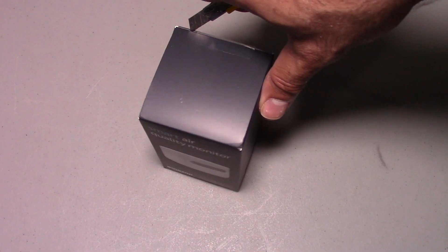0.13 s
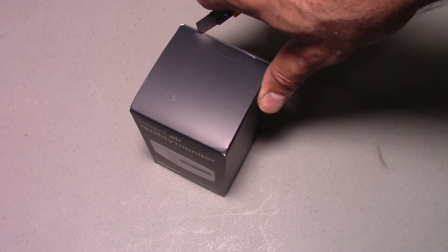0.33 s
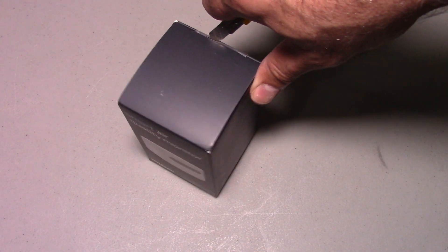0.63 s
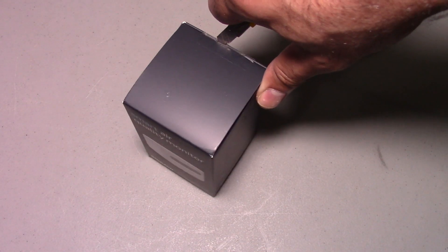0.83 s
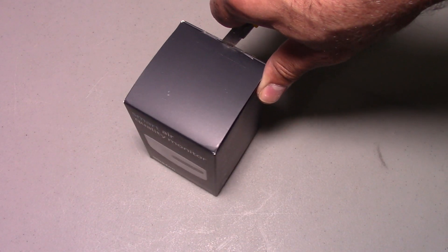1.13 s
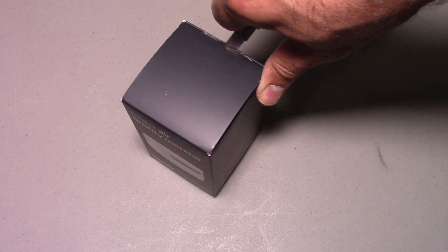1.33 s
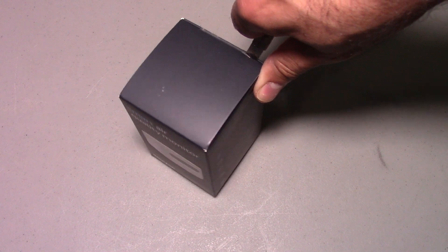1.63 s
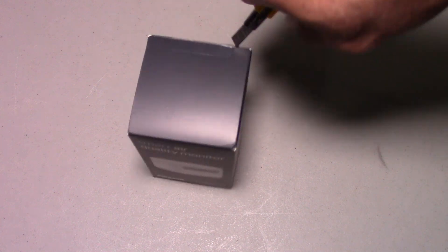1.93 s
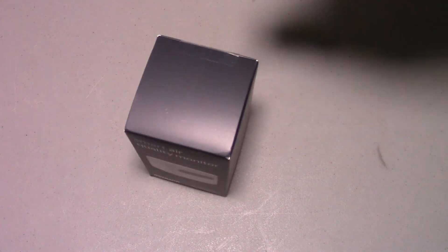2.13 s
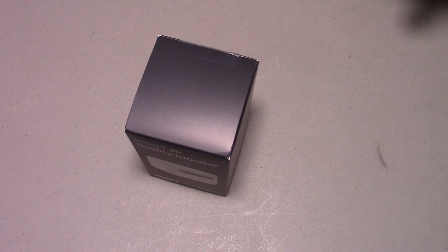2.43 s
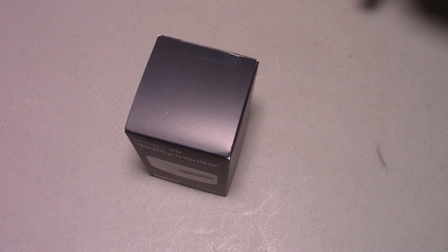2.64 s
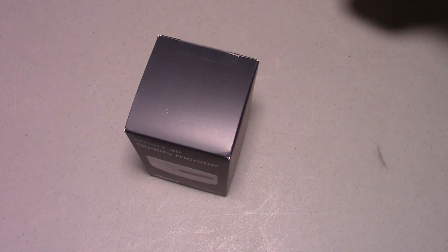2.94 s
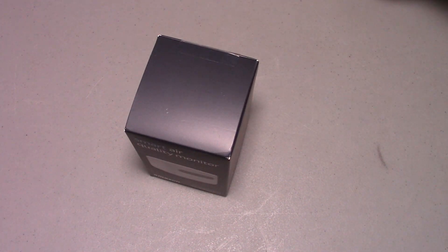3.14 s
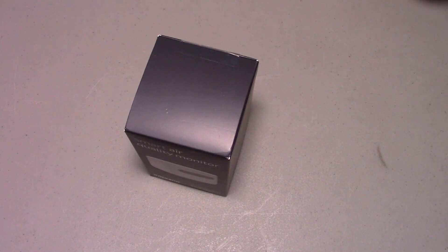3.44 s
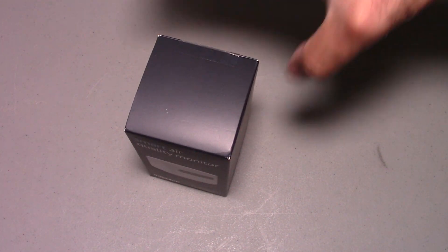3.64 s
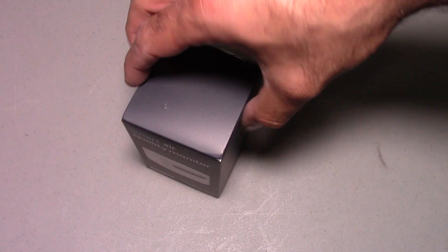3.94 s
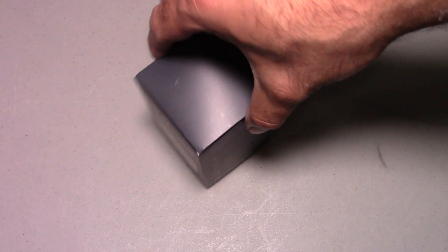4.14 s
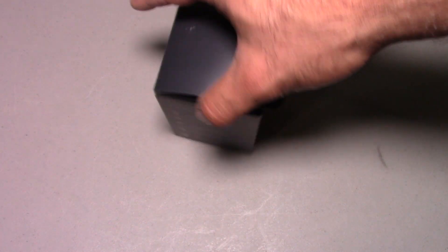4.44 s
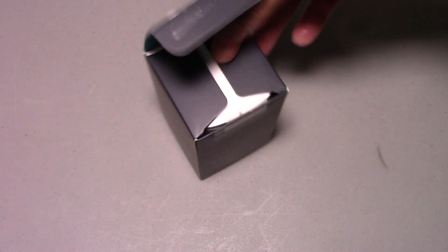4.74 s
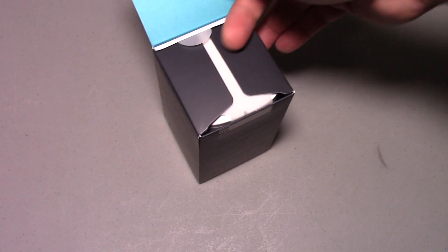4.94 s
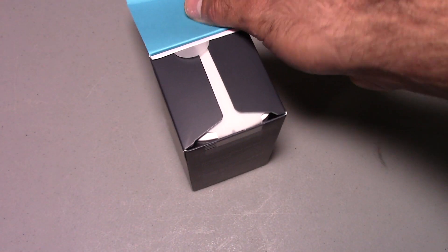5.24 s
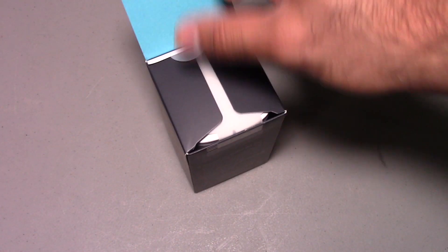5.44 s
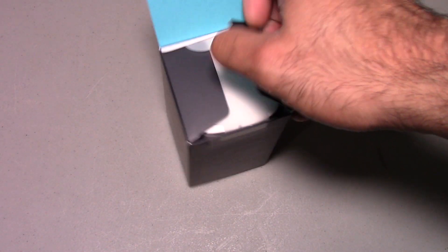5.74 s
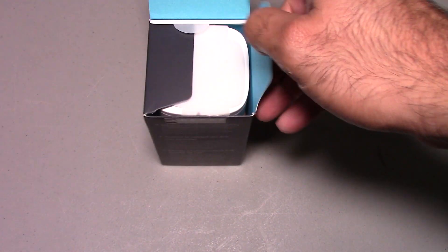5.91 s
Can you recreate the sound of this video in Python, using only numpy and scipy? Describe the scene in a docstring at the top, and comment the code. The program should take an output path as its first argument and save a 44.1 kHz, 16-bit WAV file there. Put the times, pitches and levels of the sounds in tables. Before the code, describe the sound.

A blade crackles through a cardboard seal, ratchets back into its handle and clatters onto a desk, then box flaps pop open with rubs and squeaks.

```python
"""First a seal crackles: a snap-off knife slits a small cardboard box on a desk in a bare, live room.
The blade ratchets back into its handle, soft scuffs follow, and the knife drops on the desk;
then the lid is pulled free and the flaps fold open, with taps, rubs and thin squeaks.
Card and blows are bursts of noisy slips through resonances; blade and desk are decaying sines.
One microphone stands on the desk, amid a low room rumble and an even hiss."""
import sys
import numpy as np
from scipy import signal
from scipy.fft import rfft, irfft
from scipy.io import wavfile
from scipy.ndimage import uniform_filter1d

SR = 44100
rng = np.random.default_rng(int(sys.argv[2]) if len(sys.argv) > 2 else 0)


def wrap_up_sound(samples):
    """Save the sound to the file named by the first command line argument, as 16-bit audio."""
    columns = np.atleast_2d(samples).T
    # keep every value between -1 and 1, then stretch to whole-number steps
    tamed = np.clip(columns, -1, 1)
    steps = np.round(tamed * 32767).astype(np.int16)
    wavfile.write(sys.argv[1], SR, steps)


N = 267731
TIME = np.arange(N) / SR
SHORT = TIME[:SR // 2]  # half a second, enough for any single event
TOP_HZ = 16200  # upper limit of the microphone signal


def undb(db):
    """Decibels to gain."""
    return 10 ** (np.asarray(db) / 20)


def unit(x):
    """Scale to an energy of one."""
    return x / np.sqrt(np.sum(x ** 2))


def steady(x):
    """Scale to an rms of one."""
    return x / np.std(x)


def add(track, s, x):
    """Mix x into the track at time s."""
    i = max(int(s * SR), 0)
    track[i:i + len(x)] += x[:N - i]


def delayed(x, s):
    """The same sound s seconds later."""
    return np.pad(x, (max(int(s * SR), 0), 0))[:len(x)]


def gate(age, length, attack_s, release_s):
    """Attack, hold and release within the given length."""
    attack = np.clip(age / attack_s, 0, 1)
    release = np.clip((length - age) / release_s, 0, 1)
    return attack * release


def colour(x, points):
    """Causal minimum-phase filter with a spectrum of (frequency [Hz], level [dB]) points."""
    hz, db = np.transpose(points)
    size = 8192
    grid = np.maximum(np.fft.rfftfreq(size, 1 / SR), 1)
    spectrum_db = np.interp(np.log(grid), np.log(hz), db)
    cepstrum = irfft(np.log(undb(spectrum_db)))
    # fold the cepstrum forward so that nothing sounds before its cause
    cepstrum[1:size // 2] *= 2
    cepstrum[size // 2 + 1:] = 0
    response = irfft(np.exp(rfft(cepstrum)))
    return signal.fftconvolve(x, response)[:len(x)]


def resonate(x, peaks):
    """Parallel (frequency [Hz], width [Hz], level [dB]) resonances, run twice for steep skirts."""
    out = 0
    for hz, width, db in peaks:
        b, a = signal.iirpeak(hz, hz / (2 * width), fs=SR)
        once = signal.lfilter(b, a, x)
        out = out + undb(db) * signal.lfilter(b, a, once)
    return out


def grit(count, spread_db):
    """Dense tiny slips of very unequal size."""
    return rng.standard_normal(count) * undb(spread_db * rng.standard_normal(count))


def contact(length, spread_db=4):
    """A cluster of slips that builds quickly and dies away; length is its decay time."""
    age = SHORT / max(length, 1e-4)
    return grit(len(SHORT), spread_db) * np.exp(-age) * (1 - np.exp(-6 * age))


# first reflections off the walls: (delay [s], level [dB])
WALL_ECHOES = [(.0057, -14), (.0092, -13), (0.0103, -29.5)]
# reverberation of the bare room: (frequency [Hz], time to fall 60 dB [s])
ROOM_DECAY = [(100, 0.67), (300, 0.41), (1800, 0.41), (5000, 0.4), (9000, 0.38), (16000, 0.26)]


def room(x, wet_db, build_s=0.001):
    """Direct sound, a few wall echoes and a diffuse tail drawn afresh for every position of the source."""
    hz, t60 = np.transpose(ROOM_DECAY)
    noise = rng.standard_normal(len(SHORT))
    grid, s, cells = signal.stft(noise, SR, nperseg=256)
    fade = undb(-60 * s / np.interp(grid, hz, t60)[:, None])
    tail = signal.istft(cells * fade, SR)[1][:len(SHORT)]
    response = undb(wet_db) * unit(tail * (1 - np.exp(-SHORT / build_s)))
    response[0] = 1  # direct sound
    for delay, db in WALL_ECHOES:
        response[int(delay * SR)] += undb(db)
    return signal.fftconvolve(x, response)[:len(x)]


# spectrum of the empty room: (frequency [Hz], relative level [dB])
AIR_COLOUR = [(20, 0.5), (32, -3.5), (50, 5), (80, -8.5), (130, -6.5), (250, -6.5), (500, -12.5),
              (900, -13.5), (1800, -23), (4500, -27.5), (8300, -24), (11000, -31), (15000, -35),
              (16000, -45)]


def air(rms_db=-52.5):
    """Low room rumble under an even hiss: steady noise with a falling spectrum."""
    return undb(rms_db) * steady(colour(rng.standard_normal(N), AIR_COLOUR))


# modes of a sheet of card:
# (multiple of the panel pitch [ratio], width [share of that pitch], relative level [dB])
PANEL_MODES = [(.68, 0.41, -7), (1, 0.244, 11.5), (1.36, 0.21, -3.5), (1.9, 0.99, -22)]


def panel(x, pitch_hz):
    """A sheet of card rings; its pitch depends on how tightly it is bent."""
    modes = [(ratio * pitch_hz, share * pitch_hz, db) for ratio, share, db in PANEL_MODES]
    return resonate(x, modes)


# resonances of the hollow box, also heard under strokes:
# (frequency [Hz], width [Hz], relative level [dB])
BOX_MODES = [(207, 53, -6.5), (360, 620, -9.5), (492, 215, 0), (613, 120, 1), (846, 730, -9.5)]
# crisp sound of the card edge, also heard in strokes: (frequency [Hz], relative level [dB])
EDGE_COLOUR = [(1200, -3.5), (2500, 1.5), (3300, 1), (4200, -1), (5300, -3.5), (6600, 0.5), (8600, 1.5),
               (10500, -8), (12500, -11.5), (16000, -25)]


def catch(length, pitch_hz, body_db, panel_db, edge_db):
    """The card catches and lets go: the hollow box, its panels and the cut edge all answer."""
    slips = contact(length)
    hollow = undb(body_db) * unit(resonate(slips, BOX_MODES))
    sheet = undb(panel_db) * unit(panel(slips, pitch_hz))
    edge = undb(edge_db) * unit(colour(slips, EDGE_COLOUR))
    return room(hollow, wet_db=-3.0) + room(sheet + edge, wet_db=-1.5)


# the blade cuts through a bit of the seal:
# (time [s], relative level [dB], slip decay [s], panel pitch [Hz], hollow box level [dB])
SEAL_CUTS = [(.001, -9.5, 0.021, 3720, -49), (0.343, -21.5, 0.0082, 1400, -7.5),
             (0.367, -24.5, 0.0052, 1580, -1), (0.476, -16.5, 0.0097, 1410, 5),
             (0.526, -21, 0.033, 1450, -7), (0.61, -18.5, 0.0081, 1390, 2),
             (1.407, -12.5, 0.014, 1450, -10), (1.455, -22.5, 0.0046, 1930, -4),
             (1.503, -17.5, 0.0092, 1490, -10), (1.788, -16.5, 0.0035, 6600, -27),
             (1.835, -28.5, 0.0045, 2000, -0.5), (2.018, -25, 0.012, 6500, -25)]


def cuts(gain_db=3, panel_db=-8):
    """The seal gives way under the blade: the cut edge crackles and the box answers."""
    out = np.zeros(N)
    for s, db, length, pitch_hz, body_db in SEAL_CUTS:
        add(out, s, undb(db + gain_db) * catch(length, pitch_hz, body_db, panel_db, edge_db=0))
    return out


# blade and fingers slide over the card:
# (start [s], length [s], relative level [dB], box and panel level against the hiss [dB])
CARD_STROKES = [(0.973, 0.18, -54.5, -13), (1.237, 0.059, -50.5, -11), (1.374, 0.14, -45, -24),
                (1.525, .12, -50.5, -17), (1.833, 0.21, -55, -6.5), (2.248, 0.081, -51.5, -27),
                (4.107, 0.12, -60.5, 6.5), (4.241, 0.36, -49.5, -4), (4.528, 0.26, -52, -11),
                (4.791, 0.16, -49, -19), (5.112, 0.052, -40, -26), (5.392, 0.062, -54.5, 6.5),
                (5.62, 0.27, -53, -8), (5.842, 0.2, -56.5, -5)]


def strokes(gain_db=-2, body_db=-3, panel_hz=1750, attack_s=0.036, release_s=.05, sag_db=-1.5):
    """Sliding over paper fibres: a grainy hiss that swells, eases off and fades."""
    out = np.zeros(N)
    for s, length, db, panel_db in CARD_STROKES:
        fibres = grit(int(length * SR), spread_db=6.5)
        hollow = steady(resonate(fibres, BOX_MODES))
        box = steady(panel(fibres, panel_hz)) + undb(body_db) * hollow
        rub = steady(colour(fibres, EDGE_COLOUR)) + undb(panel_db) * box
        age = TIME[:len(fibres)]
        level = undb(db + gain_db + sag_db * age / length)
        add(out, s, level * rub * gate(age, length, attack_s, release_s))
    return out


# card squeaks:
# (start [s], length [s], top pitch before waver [Hz], relative level [dB], pitch bend [share])
CARD_SQUEAKS = [(1.885, .135, 8730, -51, 0.15), (4.3, .1, 9100, -56, .08), (5.03, 0.099, 7490, -39, 0.0022),
                (5.225, 0.098, 7520, -43, .003), (5.364, 0.04, 7520, -44.5, .003)]


def squeaks(waver=0.0077, gain_db=-3.5, flutter_db=3, attack_s=0.0092, release_s=.02, sag_db=-6):
    """Faint, thin tones with an unsteady pitch and level; the pitch arches with the speed of the slide."""
    out = np.zeros(N)
    for s, length, hz, db, bend in CARD_SQUEAKS:
        age = TIME[:int(length * SR)]
        # two slow random curves, for pitch and for level
        wobble, flutter = (
            steady(uniform_filter1d(rng.standard_normal(len(SHORT)), size=100))[:len(age)]
            for _ in range(2))
        arch = 1 - bend * (2 * age / length - 1) ** 2
        pitch = hz * arch * (1 + waver * wobble)
        level = undb(db + gain_db + flutter_db * flutter + sag_db * age / length)
        tone = np.sin(2 * np.pi * np.cumsum(pitch) / SR)
        add(out, s, level * gate(age, length, attack_s, release_s) * tone)
    return out


# tiny dry ticks and soft bumps close by: (time [s], level [dB], pitch [Hz], width [Hz])
CLOSE_TICKS = [(2.129, -19, 190, 150), (2.131, -29.5, 4070, 2200), (2.156, -20.5, 140, 80),
               (2.2335, -21.5, 4630, 2778), (3.482, -22.5, 7930, 1110)]


def ticks():
    """Small dry ticks and soft bumps of the hand, the knife and the card, without any room."""
    out = np.zeros(N)
    for s, db, hz, width in CLOSE_TICKS:
        add(out, s, undb(db) * unit(resonate(contact(0.0013), [(hz, width, 0)])))
    return out


# the slider jumps one notch, also the span of the chatter: time [s]
SLIDER_NOTCHES = [2.384, 2.396, 2.413, 2.4356, 2.454, 2.4682, 2.4924, 2.5091, 2.5292, 2.544, 2.557, 2.565,
                  2.5806, 2.5847, 2.6049, 2.6082, 2.63]
# modes of blade and handle, before detuning:
# (frequency [Hz], time to fall 60 dB [s], level with blade out [dB], level with blade in [dB])
BLADE_MODES = [(1986, 0.0055, -14.5, -26.5), (3130, 0.0023, -12, -27), (4134, 0.0061, -20.5, -8.5),
               (4617, 0.0029, -6, -11), (5040, 0.0018, -5, -7.5), (6360, 0.0048, -8.5, -8),
               (7210, 0.002, -7.5, 7.5), (7850, 0.0025, 5, -8.5), (8410, 0.0026, -3.5, 5.5),
               (10000, .0012, -26, -13.5), (11430, 0.0028, -8, -13), (12940, 0.0025, -14.5, -11)]


def ratchet(click_db=7.0, push_db=5, settle_s=0.0054, detune=0.033, travel_s=.0009, snap_s=0.00037,
            desk_echo_s=.0013, desk_echo_db=-8, beam_hz=11500, beam_db=2):
    """Each notch snaps the blade; its low ring is choked as it slides into the handle."""
    out = np.zeros(N)
    hz, t60, out_db, in_db = np.transpose(BLADE_MODES)[:, :, None]
    top_octave = signal.butter(4, min(beam_hz, TOP_HZ), "high", fs=SR, output="sos")
    for s, pause in zip(SLIDER_NOTCHES, np.diff(SLIDER_NOTCHES, prepend=-np.inf)):
        # share of the way into the handle
        inside = np.interp(s, [2.495, 2.56], [0, 1])
        # notches get louder as it goes in; the spring needs time to reload
        force = undb(push_db * inside) * (1 - np.exp(-pause / settle_s))
        pitch = hz * (1 + detune * rng.standard_normal(hz.shape))
        # bending waves: the highs arrive first
        t = np.maximum(SHORT[:SR // 20] - travel_s * np.sqrt(8000 / pitch), 0)
        envelope = np.exp(-np.log(1000) * t / t60) * (1 - np.exp(-t / snap_s))
        rings = np.sin(2 * np.pi * pitch * t) * envelope / np.sqrt(t60)
        mode_gain = undb(out_db + inside * (in_db - out_db))
        click = unit(np.sum(mode_gain * rings, axis=0))
        # the top octave beams sideways and comes back off the walls
        top = signal.sosfilt(top_octave, click)
        beam = sum(delayed(top, lag) for lag, _ in WALL_ECHOES[1:])
        # the path over the desk changes as the hand moves
        desk_echo = delayed(click, desk_echo_s * rng.uniform(.7, 1.4))
        click = click + undb(desk_echo_db) * desk_echo + undb(beam_db) * beam
        padded = np.pad(click, (0, len(SHORT) - len(click)))
        add(out, s, force * undb(click_db) * room(padded, wet_db=-4.5))
    return out


# spectrum of the loose blade in its track: (frequency [Hz], relative level [dB])
BUZZ_COLOUR = [(800, -31.5), (1900, -15.5), (3100, -13.5), (4100, -5.5), (5400, -11.5), (7100, -10),
               (8700, -3), (10300, -8), (12500, -11), (16000, -25.5)]


def chatter(gain_db=-33, per_second=600, burst_s=0.00047, loose_db=11, loosest_s=2.603,
            loose_width_s=0.02, attack_s=0.008, overrun_s=0.017, release_s=0.0148):
    """The loose blade buzzes in its track in tiny bursts, most of all just before the slider stops."""
    knocks = (rng.random(N) < per_second / SR) * rng.uniform(0.25, 1, N)
    bursts = signal.lfilter([1], [1, -np.exp(-1 / (burst_s * SR))], knocks)
    buzz = steady(colour(bursts * rng.standard_normal(N), BUZZ_COLOUR))
    start, stop = SLIDER_NOTCHES[0], SLIDER_NOTCHES[-1]
    sliding = gate(TIME - start, stop - start + overrun_s, attack_s, release_s)
    looseness = np.exp(-((TIME - loosest_s) / loose_width_s) ** 2)
    return room(buzz * sliding * undb(gain_db + loose_db * looseness), wet_db=0)


# soft scuffs while the knife is carried away: (time [s], relative level [dB])
KNIFE_SCUFFS = [(3.109, -27), (3.239, -13.5)]
# spectrum of a scuff: (frequency [Hz], relative level [dB])
WOODY_COLOUR = [(300, -30), (600, -5.5), (900, -0.5), (1250, -1.5), (1600, -8), (2100, -1.5), (2900, -18),
                (7000, -15.5), (15000, -25)]


def scuffs(gain_db=3, decay_s=0.027):
    """Dull, woody brushes off to the side of the box: coloured clusters of slips."""
    out = np.zeros(N)
    for s, db in KNIFE_SCUFFS:
        brush = unit(colour(contact(decay_s), WOODY_COLOUR))
        add(out, s, undb(db + gain_db) * room(brush, wet_db=-3))
    return out


# the knife lands, bounces and tips over: (time [s], relative level [dB], contact decay [s],
# relative desk ring level [dB], rattle level against the knock [dB])
KNIFE_BLOWS = [(3.4932, 0, 0.0043, 3, -11), (3.502, -5, 0.0068, -17, -8.5), (3.521, -12.5, 0.012, 9, -2.5),
               (3.541, -11, 0.023, 0.5, -9.5), (3.735, -20.5, 0.0042, 12, -1.5),
               (3.763, -27.5, 0.0069, 18, 5.5), (3.803, -29, 0.0055, 14, -18),
               (3.884, -36, 0.0035, 14, -15)]
# modes of the desk: (frequency [Hz], relative level [dB], time to fall 60 dB [s])
DESK_MODES = [(192.8, -2.5, 0.34), (338.8, 3.5, 0.3), (364, -5, 0.29), (386, -3, 0.28), (452, -1.5, 0.28),
              (509, 3.5, 0.27), (553, -3.5, 0.51), (650, 0, 0.19), (715, -6, 0.22), (804, 3, 0.12),
              (880, 3, 0.17), (1044, -1, 0.28)]
# spectrum of the handle's knock: (frequency [Hz], relative level [dB])
KNOCK_COLOUR = [(60, -17.5), (140, -16), (200, -11), (260, -8), (350, -4), (470, -6.5), (700, 0),
                (1050, -4.5), (1300, -9.5), (2000, -8), (2450, -7.5), (2800, -13.5), (3900, -14),
                (8600, -31.5), (16000, -39)]
# spectrum of the blade rattling in the handle: (frequency [Hz], relative level [dB])
RATTLE_COLOUR = [(1500, -56), (3200, -7.5), (4200, -11.5), (5200, -11.5), (8200, -1), (10000, -10),
                 (16000, -31)]


def dropped_knife(blow_db=14, ring_db=10, swell_s=0.0026, thump_hz=55, thump_s=0.032, thump_db=-7):
    """Each blow knocks the handle, rattles the blade inside it and sets the desk ringing."""
    out = np.zeros(N)
    hz, mode_db, t60 = np.transpose(DESK_MODES)[:, :, None]
    # neighbouring modes swing opposite ways
    polarity = (-1) ** np.arange(len(DESK_MODES))[:, None]
    rings = polarity * np.sin(2 * np.pi * hz * SHORT) * np.exp(-np.log(1000) * SHORT / t60)
    # the first blow shakes the microphone stand: a brief low thump
    stand_thump = np.sin(2 * np.pi * thump_hz * SHORT) * np.exp(-SHORT / thump_s)
    add(out, KNIFE_BLOWS[0][0], undb(thump_db) * unit(stand_thump))
    for s, db, length, desk_db, rattle_db in KNIFE_BLOWS:
        knock = unit(colour(contact(length, spread_db=4), KNOCK_COLOUR))
        rattle = unit(colour(contact(length, spread_db=2.5), RATTLE_COLOUR))
        blow = knock + undb(rattle_db) * rattle
        add(out, s, undb(db + blow_db) * room(blow, wet_db=2.5))
        # a gentle blow is a longer push and reaches only the low modes
        reach_hz = 1500 * undb(0.37 * db)
        mode_gain = undb(mode_db) / (1 + (hz / reach_hz) ** 4)
        ring = np.sum(mode_gain * rings, axis=0) * (1 - np.exp(-SHORT / swell_s))
        add(out, s, undb(db + desk_db + ring_db) * unit(ring))
    return out


# lid or flap catches and springs free: (time [s], relative level [dB], slip decay [s],
# panel pitch [Hz], pitch on release [Hz], hollow box level [dB], crisp edge level [dB])
FLAP_CATCHES = [(4.186, -17, .007, 1250, 1400, 8, 5), (4.401, -4.5, .003, 1460, 1730, -3, -18),
                (4.539, -18.5, .006, 1690, 1900, -4.5, -22), (4.572, -29.5, .003, 2100, 2200, 7.5, -16),
                (4.65, -26.5, 0.014, 1490, 1800, 8, -7), (4.762, -14.5, .004, 1680, 2110, -23, -5.5),
                (4.795, -28, .003, 1350, 1510, 2.5, 0.5), (5.03, -32.5, .008, 1200, 1300, 8, 3),
                (5.07, -22.5, .004, 1280, 950, 1, -13), (5.43, -28, .003, 3040, 2810, -14, -5),
                (5.586, -20.5, .0045, 1400, 2700, 5, -5), (5.716, -17, .008, 1260, 2980, -2, -4),
                (5.931, -23, .004, 940, 3140, 3, -4)]


def flaps(gain_db=3, release_db=-5, release_edge_db=10, release_lag=1.9, release_stretch=1.48):
    """Each flap sounds twice: it catches, then springs free, softer in the body but crisper."""
    out = np.zeros(N)
    for s, db, length, pitch_hz, release_hz, body_db, edge_db in FLAP_CATCHES:
        caught = catch(length, pitch_hz, body_db, 0, edge_db)
        add(out, s, undb(db + gain_db) * caught)
        # lag and stretch count in slip decays
        release = catch(release_stretch * length, release_hz, body_db, 0, edge_db + release_edge_db)
        add(out, s + release_lag * length, undb(db + gain_db + release_db) * release)
    return out


def scene():
    """Knife and box in the same room, heard by one microphone standing on the desk."""
    box = cuts() + room(strokes() + squeaks(), wet_db=-4.5) + ticks() + flaps()
    knife = ratchet() + chatter() + scuffs() + dropped_knife()
    return (air() + box + knife)[None]


def record(dry):
    """The microphone signal clips at full scale, then a steep low-pass cuts the top."""
    low_pass = signal.ellip(10, .2, 70, TOP_HZ, fs=SR, output="sos")
    return signal.sosfilt(low_pass, np.clip(dry, -1, 1))


dry = scene()
out = record(dry)
wrap_up_sound(out)
```